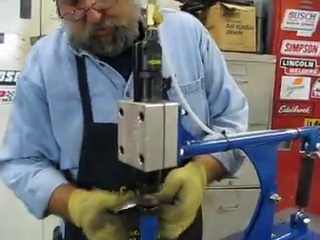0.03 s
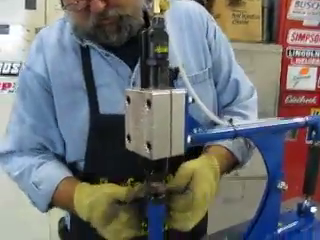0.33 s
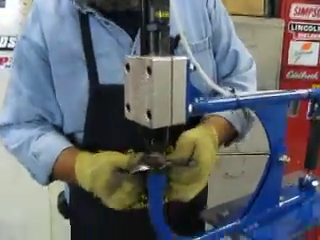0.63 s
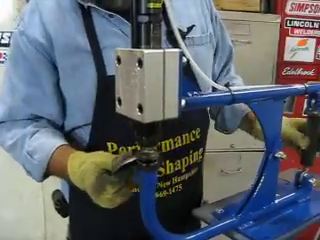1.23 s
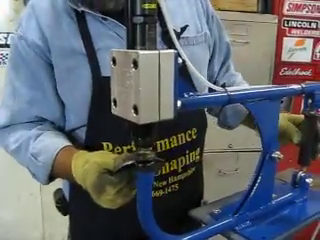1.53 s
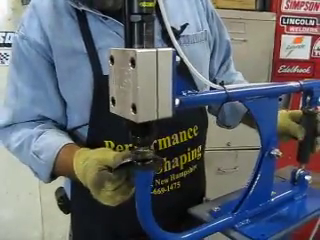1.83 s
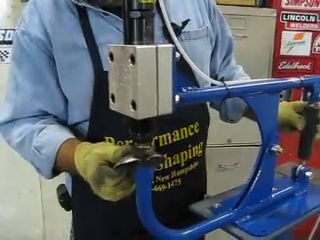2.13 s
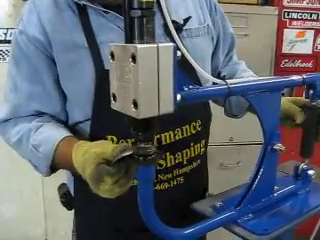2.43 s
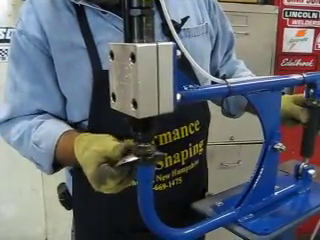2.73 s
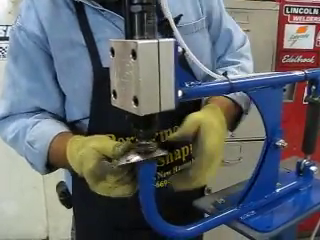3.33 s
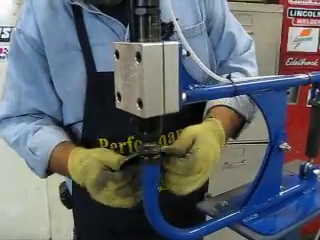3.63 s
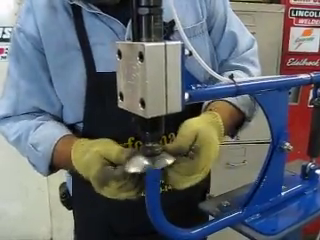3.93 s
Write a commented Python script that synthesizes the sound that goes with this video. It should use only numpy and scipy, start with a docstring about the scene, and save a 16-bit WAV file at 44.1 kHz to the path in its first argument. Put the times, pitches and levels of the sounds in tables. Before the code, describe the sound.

An air-powered hammer beats a steel panel nonstop in a fast, bright rattle with hissing air. The panel clacks now and then, and the small anvil rings more strongly after the first third. Heard close by in a workshop.

```python
"""In a workshop, an air-driven planishing (smoothing) hammer beats a hand-held steel panel
about 45 times a second. Each blow cracks, rings the hammer's steel, rattles the tool holder,
shakes the frame and lets out a puff of air. The panel clatters as it is shifted, and the die
(the small anvil under it) rings out once the blows land firmly. Now and then the stand thumps.
Walls echo it all over a steady hiss and rumble."""
import sys
import numpy as np
from scipy import signal
from scipy.fft import rfft, irfft, next_fast_len
from scipy.io import wavfile
from scipy.ndimage import map_coordinates

SR = 44100
rng = np.random.default_rng(int(sys.argv[2]) if len(sys.argv) > 2 else 0)


def wrap_up_sound(samples):
    """Save the sound to the file named by the first command line argument, as 16-bit audio."""
    columns = np.atleast_2d(samples).T
    # keep every value between -1 and 1, then stretch to whole-number steps
    tamed = np.clip(columns, -1, 1)
    steps = np.round(tamed * 32767).astype(np.int16)
    wavfile.write(sys.argv[1], SR, steps)


N = 176400

JITTER_S, SCATTER_DB = .0001, 1.1  # how much the blows vary in timing and strength
# force of the blows: t/s, crack level/dB, tool rebound level/dB
BLOW_FORCE = [(0, -33.5, -27.5), (.5, -28, -35), (.8, -29.5, -32), (1.3, -28, -34), (1.6, -34, -29.5),
              (2.3, -33, -33.5), (2.7, -32, -29.5), (3.2, -30.5, -31), (3.4, -33.5, -32.5), (4, -31, -28.5)]
# tones of the die: f/Hz, relative level/dB, t60/s (time to fade by 60 dB)
DIE_MODES = [(3400, -15, .03), (3610, -11, .03), (4680, -8, .014), (4870, -4, .014), (5058, 0, .032),
             (5310, -5, .018), (6885, -13, .04), (9585, -9, .025), (13765, -14, .04)]


def amp(db):
    """Turn decibels into a gain."""
    return 10 ** (np.asarray(db) / 20)


def unit(x):
    """Scale x to an average strength (rms) of 1."""
    return x / np.sqrt(np.mean(x ** 2) + 1e-20)


def along(points, hz):
    """Read between (f/Hz, value) points on a log frequency axis."""
    f, v = np.transpose(points)
    return np.interp(np.log(hz + 1), np.log(f + 1), v)


def curves(rows):
    """One value per sample for each column after the time."""
    s, *columns = np.transpose(rows)
    return [np.interp(np.arange(N) / SR, s, column) for column in columns]


def through(x, response):
    """Make every sample of x set off a copy of the response."""
    return signal.fftconvolve(x, response)[:N]


def colour(x, spectrum, size=4096):
    """Give x a tone colour, using a filter of energy 1."""
    cepstrum = irfft(np.log(amp(along(spectrum, np.fft.rfftfreq(size, 1 / SR)))))
    cepstrum[1:size // 2] *= 2  # folded so that nothing sounds ahead of a hit
    cepstrum[size // 2 + 1:] = 0
    response = irfft(np.exp(rfft(cepstrum)))
    return through(x, response / np.linalg.norm(response))


def impulses(times, db):
    """A one-sample click at each time."""
    return np.bincount(np.abs(np.round(times * SR)).astype(int), amp(db), N)[:N]


def taps(times, scatter_db=SCATTER_DB):
    """Clicks of uneven strength."""
    return impulses(times, scatter_db * np.clip(rng.standard_normal(len(times)), -2, 2))


def bursts(hits, t60, rise):
    """A puff of fading noise for each hit; t60 and rise are in seconds."""
    t = np.arange(SR // 4) / SR
    envelope = amp(-60 * t / t60) * (1 - np.exp(-t / rise))
    return through(hits, envelope) * rng.standard_normal(N)


def ring(x, modes):
    """Strike an object with x so that its own tones (modes) ring and fade; rms 1."""
    t = np.arange(SR // 3) / SR
    tones = [(-1) ** k * amp(db - 60 * t / t60) / np.sqrt(t60) * np.cos(2 * np.pi * hz * t)
             for k, (hz, db, t60) in enumerate(modes)]
    return unit(through(x, sum(tones)))


def background():
    """The steady hiss and rumble of the workshop."""
    spectrum = [(27, 3), (42, -12), (70, -15), (150, -10), (300, -1), (1000, -1), (5000, -3), (15000, -4)]  # tone colour: f/Hz, relative level/dB
    return amp(-41.5) * colour(rng.standard_normal(N), spectrum)


def drifting(x, delay, sway_s=.00022, sways_per_s=4):
    """Delay x along a path that changes as the hand-held microphone sways."""
    n = np.arange(N)
    positions = rng.standard_normal(int(N * sways_per_s / SR) + 4)
    sway = map_coordinates(positions, [n * sways_per_s / SR])
    return map_coordinates(x, [n - (delay + sway_s * sway) * SR])


def workshop(x):
    """The sound arrives directly, then as near echoes and a short, blurred tail."""
    walls = [(.0059, .33), (.0078, .16), (.0125, .12)]  # echoes off the near cabinet and walls: delay/s, gain
    fade_times = [(200, 0.34), (2000, 0.45), (6000, 0.1), (14000, 0.015)]  # how long the room rings: f/Hz, t60/s
    tail_gain = amp(-8.5)
    hz, t, noise = signal.stft(rng.standard_normal(SR // 3), SR, nperseg=256)
    fade = amp(-60 * t / along(fade_times, hz)[:, None])
    tail = signal.istft(noise * fade, SR, nperseg=256)[1]
    blur = drifting(through(x, tail_gain * tail / np.linalg.norm(tail)), walls[0][0])
    echoes = sum(gain * drifting(x, delay) for delay, gain in walls)
    energy = 1 + tail_gain ** 2 + sum(gain ** 2 for delay, gain in walls)
    return (x + echoes + blur) / np.sqrt(energy)


def exhaust(times):
    """A puff of spent air follows each blow, over a steady leak."""
    spectrum = [(60, -36), (200, -25), (1000, -13), (3000, -7), (6500, -5), (9000, -3), (11500, 0),
                (13300, -3), (16000, -3)]  # hiss of the air: f/Hz, relative level/dB
    puffs = amp(-38) * unit(bursts(taps(times), t60=.029, rise=.00047))
    leak = amp(-56) * rng.standard_normal(N)
    return colour(puffs + leak, spectrum)


def frame(times):
    """The stand, the tube frame and its arm hum under the blows."""
    levels = [(.35, -55, -52, -59), (.45, -44, -52, -58), (.56, -54, -52, -58), (.8, -44, -51, -57),
              (1.2, -50, -52, -58), (1.31, -43, -53, -58), (1.45, -58, -53, -49), (2.45, -59, -51, -53),
              (2.58, -51, -46, -54), (3.1, -52, -50, -60), (4, -53, -49, -59)]  # hum: t/s, stand level/dB, frame level/dB, arm level/dB
    # tones of each part: f/Hz, relative level/dB, t60/s
    stand = [(88, -17, .2), (175, -14, .2), (272, 0, .1)]
    tubes = [(705, 1, .14), (848, -3, .1), (1218, 3, .12), (1764, 0, .1)]
    arm = [(424, 0, .14)]
    hits = taps(times)
    shake = unit(hits) + .5 * unit(bursts(hits, t60=.07, rise=.0005))
    return sum(amp(db) * ring(shake, modes) for db, modes in zip(curves(levels), (stand, tubes, arm)))


def thumps():
    """Now and then the stand gives a dull thump."""
    events = [(.019, -31), (.75, -33), (1.026, -27.5), (1.42, -35), (2.158, -35)]  # thumps: t/s, level/dB
    spectrum = [(25, -1), (60, 16.5), (150, 11.5), (280, 14.5), (800, 7.5), (2000, -26), (6000, -58)]  # their tone colour: f/Hz, relative level/dB
    knocks = impulses(*np.transpose(events))
    return colour(bursts(knocks, t60=.03, rise=.00062), spectrum)


def holder(times):
    """The loose tool knocks in its holder and rattles between blows."""
    levels = [(0.06, -43), (0.1, -63), (0.36, -40.5), (0.6, -37.5), (0.73, -42), (1.03, -36), (1.25, -40.5),
              (2.02, -38), (2.18, -34.5), (2.23, -40), (2.85, -34.5), (3.44, -38), (3.96, -38)]  # strength of the rattle: t/s, relative level/dB
    spectrum = [(500, -31.5), (1800, -9.5), (2600, -4.5), (3500, -2), (4400, -5), (6500, -5), (9000, -16),
                (16000, -46)]  # its tone colour: f/Hz, relative level/dB
    hits = taps(times)
    hits += .21 * taps(times + .019 * rng.random(len(times)), 2 * SCATTER_DB)
    knock = unit(bursts(hits, t60=.0057, rise=.0001))
    rattle = 2.64 * unit(bursts(hits, t60=.056, rise=.0021))
    return amp(curves(levels)[0] + 4.5) * unit(colour(knock + rattle, spectrum))


def clinks():
    """Single bright clinks as the tool meets the bare die."""
    events = [(.2055, -14), (.274, -19), (.2975, -17), (.547, -18), (.5915, -15), (.6155, -16)]  # clinks: t/s, peak level/dB
    s, db = np.transpose(events)
    ringing = ring(impulses(s, db), DIE_MODES)
    return amp(db.max()) * ringing / np.abs(ringing).max()


def slaps(t60=.028, width=.22):
    """Caught off the die while shifted, the panel gives a hollow clack whose pitch depends on the grip."""
    events = [(0.225, -17.5, 2060), (0.988, -21.5, 3180), (1.007, -19, 2830), (1.078, -20, 2600),
              (2.16, -18, 2900), (2.181, -20, 2900), (3.346, -25, 2200), (3.389, -23, 2000),
              (3.857, -13, 1860), (3.876, -18, 1920), (3.898, -19, 1720)]  # loose slaps: t/s, level/dB, centre f/Hz
    out, t = np.zeros(N + SR), np.arange(SR // 10) / SR
    for s, db, hz in events:
        band = signal.butter(2, [hz * (1 - width), hz * (1 + width)], "band", fs=SR, output="sos")
        clack = unit(signal.sosfilt(band, rng.standard_normal(len(t))))
        out[round(s * SR):][:len(t)] += amp(db - 60 * t / t60) * clack
    return out[:N]


def panel(times):
    """The panel, damped by gloves, slaps and buzzes at each blow."""
    levels = [(0.02, -35), (0.22, -36.5), (0.33, -47), (0.6, -35.5), (0.75, -44), (1.09, -34.5),
              (1.24, -40.5), (2.07, -47.5), (2.1, -37), (2.48, -55), (2.55, -32.5), (3.15, -42.5),
              (3.31, -36.5), (3.74, -35.5), (3.87, -34.5), (3.97, -35)]  # strength of the clatter: t/s, relative level/dB
    spectrum = [(50, -41), (200, -26.5), (500, -18), (1000, -11), (1400, -3.5), (2000, -1.5), (2600, -2),
                (4000, -15), (9000, -48.5)]  # its tone colour: f/Hz, relative level/dB
    hits = taps(times)
    slap = unit(bursts(hits, t60=.009, rise=.0001))
    buzz = 1.93 * unit(bursts(hits, t60=.11, rise=.00092))
    return amp(curves(levels)[0] - 1) * unit(colour(slap + buzz, spectrum))


def die(times, lag_s=.0003):
    """Just after the crack the tool clanks onto the die, which rings and chatters on its seat."""
    levels = [(0, -44), (.6, -43), (.8, -52), (1.35, -52), (1.4, -33), (1.52, -29), (1.85, -27),
              (1.97, -33), (2.18, -29), (2.3, -45), (2.35, -27), (2.45, -33), (2.9, -27), (3.2, -26.5),
              (3.43, -30), (3.54, -26), (3.82, -30), (4, -30)]  # strength of the ringing: t/s, relative level/dB
    touches = [(.0044, -13), (-.0032, -7.5)]  # lighter touches: t/s from the blow, relative level/dB
    spectrum = [(400, -42), (1500, -11), (3500, -8), (5000, -4), (6800, -7), (9000, -11.5), (12000, 3),
                (16000, -4.5)]  # tone colour of the clank: f/Hz, relative level/dB
    hits = taps(times + lag_s, SCATTER_DB / 2)
    bounces = sum(amp(db) * taps(times + offset + JITTER_S * rng.standard_normal(len(times)))
                  for offset, db in touches)
    chatter = .4 * unit(bursts(hits, t60=.022, rise=.0001))
    ringing = ring(unit(hits + bounces) + chatter, DIE_MODES)
    clank = unit(colour(bursts(hits, t60=.014, rise=.00018), spectrum))
    return amp(curves(levels)[0] + 1.5) * ringing + amp(curves(BLOW_FORCE)[1]) * clank


def hammer(times, piston_lead_s=.0031):
    """Steel on steel: a short crack and a very high, fluttering ring; the returning piston ticks."""
    hard_blows = [.025, .134, .157, .5, .659, 1.031, 1.328, 1.373, 1.419, 1.464, 2.459, 2.481]  # the blows nearest these times land harder: t/s
    spectrum = [(60, -36), (600, -13), (1500, -6), (3200, -2), (5000, -4), (7000, -2), (9500, 1),
                (12500, 2.5), (13300, -6), (16000, -8)]  # tone colour of the crack: f/Hz, relative level/dB
    levels = [(0, -28, -45), (.17, -28, -46), (.3, -33, -31), (.42, -33, -33), (.5, -30, -39),
              (.6, -31, -33), (.8, -33, -39), (1.03, -30, -41), (1.18, -34, -41), (1.27, -35, -32),
              (1.4, -31, -35), (1.52, -29, -50), (2.47, -30, -49), (2.56, -37, -48), (4, -39, -48)]  # ringing: t/s, main and upper relative level/dB
    # tones of the hammer's steel: f/Hz, relative level/dB, t60/s
    main_modes = [(12493, 0, .11), (12380, -6, .015), (12640, -6, .015)]
    upper_modes = [(14010, -5, .06), (15490, 0, .07)]
    hard_times = np.array([times[np.argmin(abs(times - s))] for s in hard_blows])
    extra_force = .446 * taps(hard_times)
    hits = taps(times) + extra_force
    ticks = amp(-9) * taps(times - piston_lead_s, 2 * SCATTER_DB)
    crack = unit(colour(bursts(hits + ticks, t60=.0023, rise=.00012), spectrum))
    pings = taps(times, scatter_db=2.2) + extra_force
    main_db, upper_db = curves(levels)
    ringing = amp(main_db - .5) * ring(pings, main_modes) + amp(upper_db) * ring(pings, upper_modes)
    return amp(curves(BLOW_FORCE)[0]) * crack + ringing


def blow_times():
    """The hammer lands once per cycle, a little unevenly."""
    rate = [(0.0, 47.336), (0.17, 43.136), (0.4, 44.317), (0.85, 43.171), (0.9, 42.537), (1.76, 45.806),
            (1.81, 47.597), (1.87, 45.797), (2.25, 47.319), (2.32, 46.193), (2.68, 47.112), (2.79, 46.618),
            (3.01, 48.761), (3.32, 47.152), (3.83, 46.742), (4.0, 48.04)]  # hammer speed: t/s, blows per second/Hz
    cycles = np.cumsum(curves(rate)[0]) / SR - .16  # the first blow comes .16 of a cycle in
    times = np.interp(np.arange(int(cycles[-1]) + 1), cycles, np.arange(N) / SR)
    return times + JITTER_S * rng.standard_normal(len(times))


def scene():
    """The machine in its room, over a steady hiss and rumble."""
    times = blow_times()
    metal = hammer(times) + die(times) + panel(times) + slaps() + clinks() + holder(times)
    machine = metal + frame(times) + thumps() + exhaust(times)
    return (workshop(machine) + background())[None]


def record(dry, top_hz=15850):
    """The microphone has a deep dip near 8 kHz and cuts off the highest treble."""
    notch = [(6900, -2.5), (7550, -5), (7900, -22), (8150, -8), (8550, -1.5), (9200, 0)]  # microphone response: f/Hz, level/dB
    size = next_fast_len(N + SR // 2)
    hz = np.fft.rfftfreq(size, 1 / SR)
    response = amp(along(notch, hz)) * (hz < top_hz)
    return irfft(rfft(dry, size) * response, size)[:, :N]


dry = scene()
out = record(dry)
wrap_up_sound(out)
```